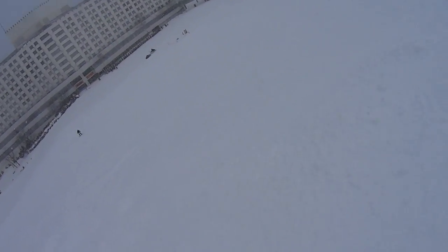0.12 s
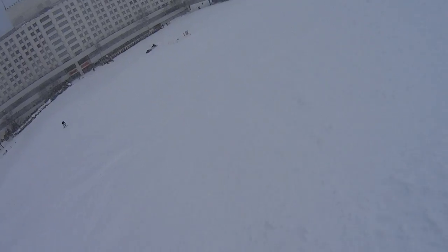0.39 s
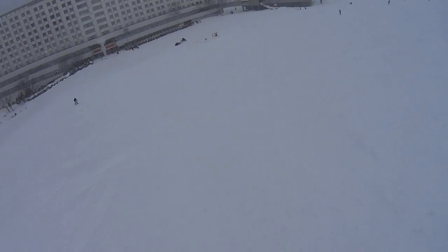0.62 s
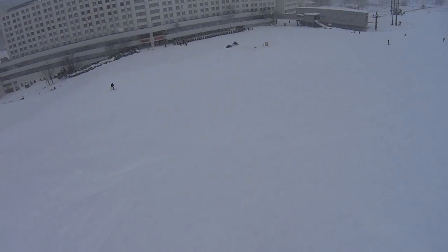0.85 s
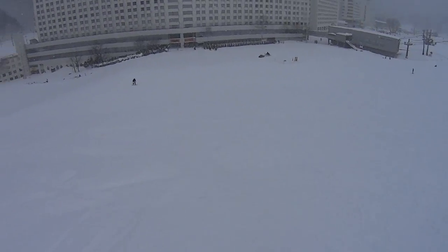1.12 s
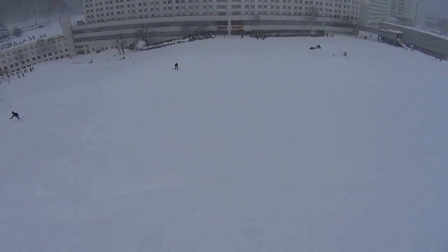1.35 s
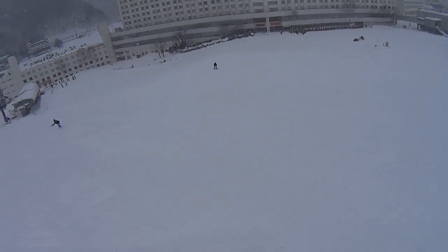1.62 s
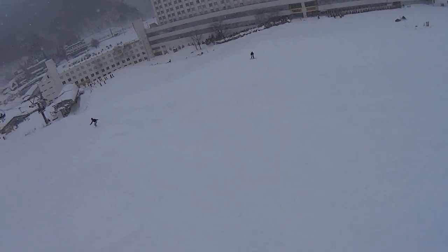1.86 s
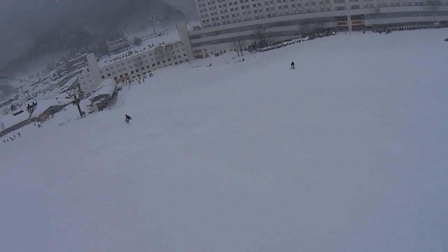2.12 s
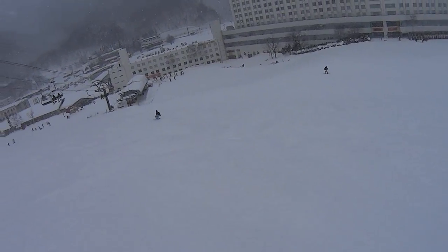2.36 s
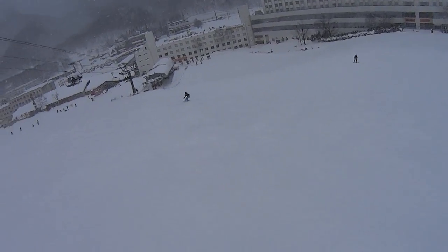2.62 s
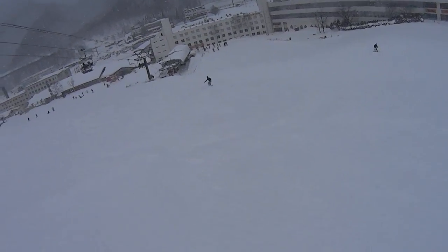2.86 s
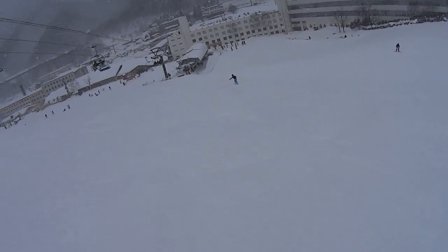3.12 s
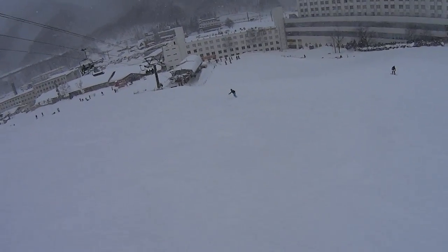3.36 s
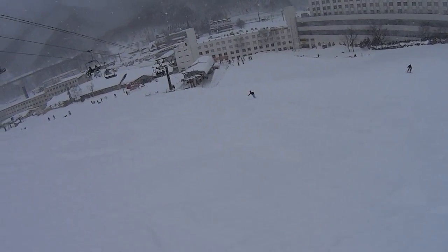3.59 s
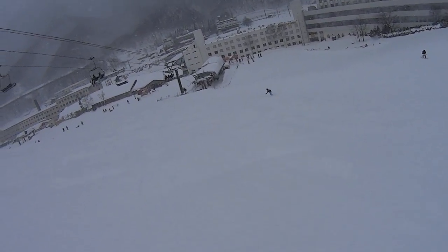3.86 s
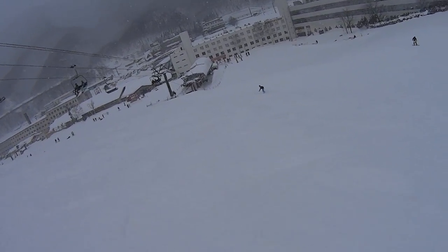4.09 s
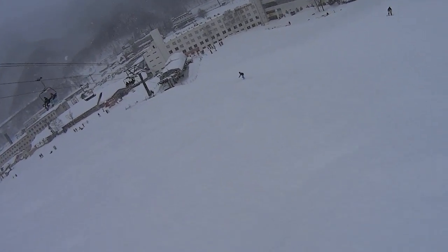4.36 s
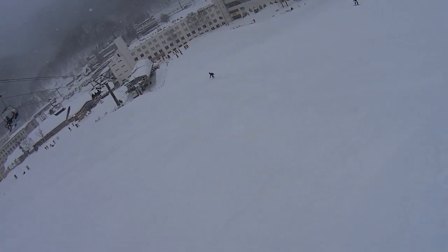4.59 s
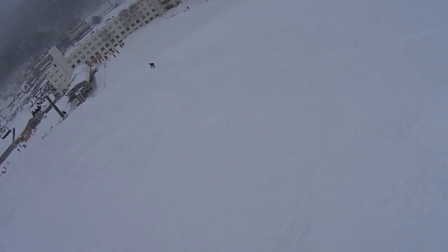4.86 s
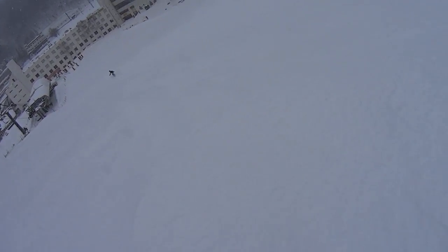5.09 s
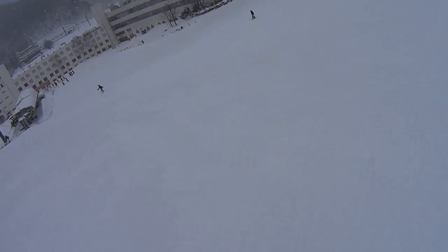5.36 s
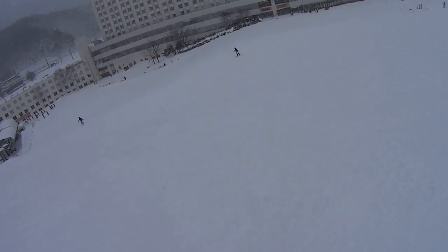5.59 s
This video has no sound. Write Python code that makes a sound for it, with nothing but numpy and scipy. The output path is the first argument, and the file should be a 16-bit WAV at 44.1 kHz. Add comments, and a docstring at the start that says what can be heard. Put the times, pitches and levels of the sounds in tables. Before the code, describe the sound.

Grainy snow hiss with rough edge scraping, irregular plastic clicks and dull helmet thuds, ending in a harder, louder scrape.

```python
"""Skis hiss over snow and their edges scrape, heard from a camera on the helmet of a skier going down a slope.
Hiss and scrape are grainy noise in flickering bands; hard scraping also makes the camera case ring.
The loose mount knocks and ticks on its plastic case: rough contacts ring groups of decaying modes.
Bumps thud through the helmet's modes; helmet drone, wind rumble and a low thrum are shaped noise beneath."""
import sys
import numpy as np
from scipy import signal
from scipy.fft import rfft, irfft
from scipy.io import wavfile
from scipy.ndimage import uniform_filter1d

SR = 44100
rng = np.random.default_rng(int(sys.argv[2]) if len(sys.argv) > 2 else 0)


def makeup_ratio(level_db):
    """Linear amplitude ratio for a level in decibels (20 dB per factor of ten)."""
    decades = np.asarray(level_db, float) / 20
    return 10 ** decades


def log_audio(samples):
    """Write samples as a 16-bit WAV file to the path given in sys.argv[1]."""
    # one column per channel
    frames = np.atleast_2d(samples).T
    # limit to full scale, then quantise
    limited = np.clip(frames, -1, 1)
    pcm = np.round(limited * 32767).astype(np.int16)
    wavfile.write(sys.argv[1], SR, pcm)


N = 252252
TIME_S = np.arange(N) / SR
HZ = np.maximum(np.fft.rfftfreq(N, 1 / SR), 1)
SIDES = np.array([[.5], [-.5]])  # splits a left minus right difference over the two ports

# The run. Each row: time in seconds, glide hiss in dB, edge scrape drive in dB, helmet drone in dB,
# calm wind in dB.
RUN = [(0.0, -45, -41.5, -49, -50), (0.12, -46.5, -49, -55.5, -66), (0.45, -49, -49, -57, -52),
       (0.7, -52, -53, -61, -62), (1.0, -52.5, -49, -53.5, -58), (1.28, -50, -49.5, -55, -50),
       (1.42, -45.5, -45, -60, -49), (1.77, -48, -47.5, -55.5, -56), (2.0, -49.5, -44.5, -52.5, -47),
       (2.17, -46.5, -42.5, -40.5, -56), (2.45, -47.5, -45.5, -52.5, -58), (2.9, -45, -47.5, -50, -53),
       (3.25, -47.5, -49, -54, -62), (3.7, -48, -50.5, -54, -67), (4.0, -47.5, -50, -52, -58),
       (4.19, -45, -48.5, -55, -58), (4.5, -47.5, -50.5, -54, -57), (4.75, -51, -47.5, -50, -48.5),
       (5.1, -49, -46.5, -49.5, -64), (5.2, -50.5, -43.5, -53, -55), (5.48, -49, -44, -53.5, -54),
       (5.72, -50, -37.5, -45.5, -45)]
# Modes of the plastic case, five groups from deep to bright. Each row: frequency in Hz, relative level in dB,
# t60 in seconds.
CASE = [
    [(776, -2.5, 0.017), (881, -2, 0.04), (1073, -7, 0.045)],
    [(1250, -11, 0.039), (1459, 8.5, 0.016), (1616, -3, 0.023)],
    [(2300, 8, 0.017), (2507, 11.5, 0.0097), (2720, -6, 0.024)],
    [(3330, -1.5, 0.004), (4000, 5, 0.0048), (4600, 6, 0.0052), (5450, 11, 0.003)],
    [(7140, 4, 0.007), (8160, 17.5, 0.0016), (9620, 5, 0.0044), (10500, 5, 0.0064)],
]


def over_hz(table):
    """Interpolates a (Hz, value) table over log frequency at every FFT bin."""
    hz, value = np.transpose(table)
    return np.interp(np.log(HZ), np.log(np.maximum(hz, 1)), value)


def unit(x):
    """Scales to rms 1."""
    return x / np.sqrt(np.mean(x ** 2))


def walk(rate_hz):
    """Random levels held 1 / rate_hz seconds and smoothed twice; rms 1."""
    hold = int(SR / rate_hz)
    held = np.repeat(rng.standard_normal(N // hold + 1), hold)
    slewed = uniform_filter1d(uniform_filter1d(held, hold), hold)
    return unit(slewed[:N])


def texture(spectrum, flicker_db, flicker_hz, grit_db, count):
    """Noise of uneven grains in count bands that flicker independently; the ports hear it partly alike."""
    # Each row: frequency in Hz, power share unrelated between the ports.
    port_apart = [(30, 0.0049), (150, 0.055), (400, 0.36), (1200, 0.39), (3000, 0.48), (9000, 0.18)]
    grit = rng.exponential(size=N // 40 + 1).repeat(40)[:N]  # one level per 40 samples
    grains = rng.standard_normal((3, N)) * makeup_ratio(grit_db * grit)
    common, left, right = rfft(grains / grains.std())
    apart = np.clip(over_hz(port_apart), 0, 1)
    both = np.sqrt(1 - apart) * common + np.sqrt(apart) * np.array([left, right])
    both = both * makeup_ratio(over_hz(spectrum))
    centres_hz = np.geomspace(spectrum[0][0], spectrum[-1][0], count)
    out = 0
    for hat in np.eye(count):
        share = np.interp(np.log(HZ), np.log(centres_hz), hat)
        out = out + irfft(both * share, N) * makeup_ratio(flicker_db * walk(flicker_hz))
    return unit(out)


def ring(x, modes):
    """Sum of decaying two-pole resonances struck by x."""
    out = 0
    for hz, db, t60_s in modes:
        pole = np.exp(2j * np.pi * hz / SR - np.log(1000) / (t60_s * SR))
        mode = signal.lfilter([0, pole.imag], [1, -2 * pole.real, abs(pole) ** 2], x)
        out = out + makeup_ratio(db) * mode / np.sqrt(len(modes))
    return out


def glide_hiss(glide):
    """Ski bases sliding over snow: broad noise that follows the glide level."""
    # Each row: frequency in Hz, relative density in dB per Hz.
    hiss_spectrum = [(1470, -23), (2500, -2.5), (4090, -3), (5770, -3), (6770, -8.5), (10600, -20.5),
                     (11300, -31), (11500, -41), (15000, -71), (22000, -120)]
    return glide * texture(hiss_spectrum, flicker_db=1.7, flicker_hz=21.96, grit_db=1.6, count=5)


def edge_scrape(scrape):
    """Ski edges scraping: peaky noise whose level rises less steeply than the drive."""
    # Each row: frequency in Hz, relative density in dB per Hz.
    scrape_spectrum = [(200, -31), (300, -16), (420, 2), (600, -6), (800, 1.5), (900, -5.5), (1020, -3),
                       (1150, 0), (1430, -2), (1650, -12), (1800, -4), (2050, -4.5), (2280, -2),
                       (2600, -14.5), (3000, -12), (3400, -8.5), (4300, -30.5)]
    noise = texture(scrape_spectrum, flicker_db=2.43, flicker_hz=25.096, grit_db=0.72, count=7)
    return scrape ** 0.82 * makeup_ratio(-6.5) * noise


def shudder(scrape):
    """Harder scraping shakes the case: dense uneven grains ring its dull and hollow modes."""
    grains_per_s = 1200
    grains = rng.standard_normal((3, N)) * (rng.random(N) < grains_per_s / SR) * makeup_ratio(0.93 * walk(40))
    shake = grains[0] + .5 * grains[1:]  # partly common to the ports
    dull = unit(ring(shake, CASE[1]))
    hollow = unit(ring(shake, CASE[2]))
    return (dull + 0.26 * hollow) * scrape ** 1.515 * makeup_ratio(21)


def blows(times, pan_db, contact_s, unlike):
    """One short rough contact per event, peaking near contact_s, a little unlike at the two ports."""
    t = np.arange(int(.04 * SR)) / SR
    noise = rng.standard_normal((len(times), 3, len(t)))
    rough = noise[:, :1] + unlike * noise[:, 1:]
    return makeup_ratio(pan_db[:, None, None] * SIDES) * rough * t * np.exp(-t / contact_s)


def strike(times, level_db, pan_db, modes, contact_s, unlike, faint_db, count):
    """Blows ring one group of modes, band-limited around it, with count faint ones scattered between."""
    when, weakness, side = rng.random((count, 3)).T
    faint_s = when * N / SR
    s, scrape_db = np.transpose(RUN)[[0, 2]]
    rough_db = np.interp(faint_s, s, scrape_db - scrape_db.mean())  # faint blows follow the edge scrape
    times = np.append(times, faint_s)
    level_db = np.append(level_db, faint_db - 12 * weakness + rough_db)
    pan_db = np.append(pan_db, 6 * (side - .5))
    band_hz = [0.75 * modes[0][0], 1.253 * modes[-1][0]]
    band = signal.butter(3, band_hz, "band", fs=SR, output="sos")
    sounds = signal.sosfilt(band, ring(blows(times, pan_db, contact_s, unlike), modes))
    out = np.zeros((2, N + sounds.shape[2]))
    for s, db, sound in zip(times, level_db, sounds):
        i = max(int((s - contact_s) * SR), 0)
        peak = np.abs(sound).max(axis=1).mean()
        out[:, i:i + sound.shape[1]] += makeup_ratio(db) * sound / peak
    return out[:, :N]


def mount_knocks():
    """The loose mount knocks on the case and rings its three lower mode groups."""
    # Each row: time in seconds, dull level in dB, hollow level in dB.
    knock_rows = [(0.0099, -19, -27), (0.2434, -26.5, -31), (0.292, -26, -29), (0.295, -24, -22.5),
                  (0.3019, -24, -18), (0.3116, -30, -26), (0.3168, -31, -23), (0.33, -33, -36),
                  (0.3925, -34, -35), (0.4014, -27, -33), (0.4324, -23, -31), (0.4385, -24, -32),
                  (0.463, -24.5, -26.5), (0.5025, -31.5, -26.5), (0.956, -22.5, -22.5), (0.99, -31, -32),
                  (1.044, -27.5, -24), (1.216, -39, -20), (1.3062, -25, -29.5), (1.3913, -30, -22),
                  (1.4203, -31, -24.5), (1.447, -27, -35), (1.463, -22, -21), (1.505, -13.5, -21),
                  (1.508, -15, -18), (1.5184, -18.5, -18), (1.6036, -45, -28.5), (1.6565, -24.5, -28),
                  (1.6959, -20, -13), (1.8267, -23.5, -17.5), (1.865, -32, -29), (1.9331, -21.5, -24),
                  (2.0897, -20, -19), (2.0949, -22, -28), (2.0998, -27, -44), (2.125, -38, -22),
                  (2.128, -25, -25), (2.162, -23.5, -19), (2.166, -16.5, -22), (2.1724, -20, -15.5),
                  (2.1783, -24, -28), (2.2007, -45, -30), (2.2299, -24, -27), (2.2797, -26.5, -51),
                  (2.345, -27, -31), (2.365, -24, -22.5), (2.516, -24.5, -18), (2.5931, -22.5, -29),
                  (2.6776, -22.5, -17.5), (2.6904, -41, -26), (2.8288, -38, -33), (2.8471, -18.5, -22),
                  (2.945, -29, -25.5), (2.969, -35, -30), (3.0707, -26, -33), (3.1003, -17.5, -21),
                  (3.1093, -21.5, -38), (3.113, -11.5, -11.5), (3.1625, -32, -35), (3.1842, -49, -27),
                  (3.192, -28.5, -42), (3.2113, -35, -40), (3.2642, -50, -35), (3.4066, -22, -27),
                  (3.4557, -24, -19.5), (3.676, -46, -32), (3.7976, -31.5, -31), (3.859, -25, -21),
                  (3.9112, -31, -24), (4.3037, -25.5, -20), (4.4252, -27.5, -24.5), (4.548, -29, -29),
                  (4.588, -38, -24), (4.6683, -29, -34), (4.7776, -50, -30), (4.793, -28, -24),
                  (4.911, -36, -27), (4.9585, -46, -28.5), (5.0404, -26, -21.5), (5.0785, -22, -15),
                  (5.1574, -47, -18), (5.1759, -31, -26), (5.2225, -30, -26), (5.2904, -28.5, -29),
                  (5.3202, -34, -22), (5.639, -27, -30)]
    s, dull_db, hollow_db = np.transpose(knock_rows)
    deep_db = 1.44 * dull_db + 1.5  # only hard knocks reach the deepest modes
    deep = strike(s, deep_db, 0 * s, CASE[0], contact_s=0.0005, unlike=0.28, faint_db=-34.5, count=60)
    dull = strike(s, dull_db, 0 * s, CASE[1], contact_s=0.00046, unlike=0.48, faint_db=-34.5, count=120)
    hollow = strike(s, hollow_db, 0 * s, CASE[2], contact_s=0.00032, unlike=0.25, faint_db=-31.5, count=120)
    return deep + dull + hollow


def case_ticks():
    """Hard snow and small parts tick on the case: shorter contacts ring its two upper mode groups."""
    # Each row: time in seconds, lower tick in dB, upper tick in dB, left minus right in dB.
    tick_rows = [(0.402, -24.5, -28, 8), (0.991, -29, -40, 0), (1.2165, -27.5, -29.5, -2),
                 (1.3235, -22.5, -31, -5), (1.3918, -25, -41, -3), (1.4637, -15, -21.5, -1),
                 (1.5144, -20, -39, -4), (1.5181, -12, -13.5, -5), (1.6574, -23, -33, -3),
                 (1.6606, -23, -42, -5), (1.6965, -24, -31, 10), (1.8273, -27, -35, -4),
                 (1.8662, -26, -34, -2), (1.9336, -16, -45, -5), (1.9835, -34, -32, -3),
                 (2.091, -15.5, -21, -6), (2.0944, -23, -32, -4), (2.1241, -20, -27.5, -5),
                 (2.1604, -16, -23, -1), (2.1725, -9.5, -20.5, -2), (2.3448, -28.5, -45, -1),
                 (2.5168, -28, -37, -4), (2.679, -28, -41, -3), (2.753, -27, -49, -6),
                 (2.8297, -16, -18.5, -4), (2.8477, -30, -45, -2), (3.0918, -22.5, -28.5, -4),
                 (3.1026, -27, -43, 3), (3.1136, -16, -50, -5), (3.1842, -20, -33, 3),
                 (3.2639, -22.5, -40, -2), (3.6762, -14, -17, 6), (3.9109, -28, -45, 0),
                 (4.111, -26, -40, -8), (4.5484, -24, -34, -2), (4.7778, -27, -37, 1),
                 (4.7936, -29, -39, -1), (4.9097, -25, -34.5, -4), (5.0118, -27, -45, 2),
                 (5.0253, -37, -31, 3), (5.0788, -26, -29, -7), (5.1582, -32, -25, -4),
                 (5.179, -28, -31, 0), (5.2229, -31.5, -33, -5), (5.2326, -35.5, -33, -11),
                 (5.26, -31, -28, 9), (5.2829, -30, -30, -11), (5.2904, -24.5, -32, 10),
                 (5.3209, -28.5, -29, -1), (5.6326, -28, -34, 2)]
    s, lower_db, upper_db, pan_db = np.transpose(tick_rows)
    lower = strike(s, lower_db, pan_db, CASE[3], contact_s=.0002, unlike=0.69, faint_db=-34.5, count=150)
    upper = strike(s, upper_db, pan_db, CASE[4], contact_s=0.00016, unlike=0.45, faint_db=-39, count=150)
    return lower + upper


def bumps():
    """Soft pushes make the helmet thud, each with its own share of upper modes."""
    # Each row: time in seconds, low push in dB, upper push in dB.
    bump_rows = [(0.025, -40, -37), (0.195, -36, -34), (0.246, -38, -37), (1.297, -45, -37),
                 (1.513, -31, -26.5), (1.832, -32, -39), (2.088, -25, -24.5), (2.158, -34.5, -34),
                 (2.23, -27, -33), (2.402, -29.5, -36), (2.595, -35, -33), (2.779, -33, -47),
                 (2.848, -26, -27), (3.069, -33, -34), (3.164, -27.5, -54), (3.405, -30, -31.5),
                 (3.497, -33, -40), (3.8, -35, -46), (3.838, -36, -34), (4.345, -33, -43),
                 (5.219, -31, -47), (5.662, -41.5, -37)]
    # Low and upper group. Each row: frequency in Hz, relative level in dB, t60 in seconds.
    helmet_modes = [
        [(115, -22, 0.079), (195.8, -0.5, .13)],
        [(303, -1, 0.033), (402, 2.5, 0.028)],
    ]
    s, *level_db = np.transpose(bump_rows)
    out = 0
    for db, modes, push_s in zip(level_db, helmet_modes, (.002, .001)):
        push = np.zeros(N)
        push[(s * SR).astype(int)] = makeup_ratio(db)
        soft = np.hanning(int(push_s * SR))
        out = out + ring(np.convolve(push, soft / soft.sum())[:N], modes)
    return out


def buffets():
    """Buffets shake the helmet: fast swells and slower fades, as added gains for wind rumble and drone."""
    # Each row: time in seconds, rumble in dB, drone in dB, fade time constant in seconds.
    buffet_rows = [(0.048, -28.5, -51, 0.045), (0.27, -49, -56, .06), (0.46, -57, -47, 0.021),
                   (0.51, -49, -61, 0.028), (0.64, -55, -60, 0.055), (0.94, -42, -58, 0.065),
                   (1.318, -50, -40, 0.032), (1.46, -40.5, -45.5, 0.14), (1.86, -49, -57, 0.055),
                   (2.17, -23.5, -42.5, 0.038), (2.39, -48, -53, 0.029), (2.58, -38, -43.5, 0.078),
                   (2.74, -42, -57, 0.033), (2.9, -37, -40.5, 0.018), (2.99, -41, -51, 0.12),
                   (3.3, -36.5, -49, 0.043), (3.41, -43, -44.5, 0.031), (3.55, -47, -65, 0.015),
                   (3.65, -50, -55, 0.019), (3.74, -39.5, -56.5, .12), (4.19, -52, -50, 0.095),
                   (4.83, -52, -53, 0.11), (5.03, -42, -54, .06), (5.18, -38, -63, 0.038),
                   (5.27, -52, -47, 0.06), (5.54, -38, -52, 0.095)]
    rise_share = 0.4  # rise time constant / fade time constant
    s, rumble_db, drone_db, fade_s = np.transpose(buffet_rows)
    after = (TIME_S - s[:, None]) / fade_s[:, None]
    swell = np.exp(-np.maximum(after, -after / rise_share))
    return makeup_ratio(rumble_db) @ swell, makeup_ratio(drone_db) @ swell


def helmet_drone(level):
    """The helmet's drone: low noise in strongly flickering bands."""
    # Each row: frequency in Hz, relative density in dB per Hz.
    drone_spectrum = [(41, -16), (70, -8.5), (108, -14), (183, -0.5), (264, -12.5), (350, -14), (460, -46),
                      (770, -120)]
    return level * texture(drone_spectrum, flicker_db=3.6, flicker_hz=17, grit_db=0.11, count=3)


def wind_rumble(level):
    """Wind: deep noise in two slowly flickering bands."""
    # Each row: frequency in Hz, relative density in dB per Hz.
    wind_spectrum = [(8.8, -26), (15, 5.5), (38, 7.5), (52, 0.5), (75, -18), (100, -12), (130, -49),
                     (220, -120)]
    return level * texture(wind_spectrum, flicker_db=1.2, flicker_hz=5.3, grit_db=.1, count=2)


def low_thrum():
    """Low thrum between rumble and drone: narrow noise on its own level curve."""
    # Each row: time in seconds, level in dB.
    thrum_level = [(0.0, -53), (0.16, -55), (0.62, -67.5), (2.26, -55.5), (2.63, -63), (3.1, -61),
                   (4.11, -66), (5.15, -51), (5.72, -55)]
    # Each row: frequency in Hz, relative density in dB per Hz.
    thrum_spectrum = [(40, -30), (62, 0.5), (100, 1.5), (135, -8.5), (200, -41)]
    level = makeup_ratio(np.interp(TIME_S, *np.transpose(thrum_level)))
    return level * texture(thrum_spectrum, flicker_db=2.5, flicker_hz=11, grit_db=.1, count=2)


def scene():
    """Skis, case, helmet and wind summed at the two ports."""
    s, *columns = np.transpose(RUN)
    glide, scrape, drone, wind = (makeup_ratio(np.interp(TIME_S, s, db)) for db in columns)
    rumble, shake = buffets()
    skis = glide_hiss(glide) + edge_scrape(scrape)
    case = shudder(scrape) + mount_knocks() + case_ticks()
    low = helmet_drone(drone + shake) + wind_rumble(wind + rumble) + low_thrum()
    return skis + case + bumps() + low


def top_cut(x):
    """Nothing passes above the cut-off."""
    return signal.sosfilt(signal.butter(12, 12260, fs=SR, output="sos"), x)


def record(dry):
    """Two ports in the case hear with their own level and phase; a steep low-pass cuts the top."""
    # Each row: frequency in Hz, phase lead of the left port in radians.
    port_lead = [(0, -1), (340, 0.86), (600, 2.5), (1210, 1.35), (1980, 1.32), (2330, 0.96), (2760, 1.03),
                 (3360, 0.84), (4310, -0.2), (6030, -0.1), (7150, 0.4), (8610, 0.45), (11000, 1.23),
                 (11800, -12)]
    # Each row: frequency in Hz, left minus right in dB.
    port_balance = [(60, 1), (110, 2.5), (190, 1), (350, 3), (620, -1), (1120, 0), (2010, 1.5), (3620, 2.5),
                    (6490, 1.0), (11700, 0.5)]
    ports = makeup_ratio(over_hz(port_balance) * SIDES) * np.exp(1j * over_hz(port_lead) * SIDES)
    heard = irfft(rfft(dry) * ports, N)
    top_hz = 10980
    low_pass = signal.ellip(7, .3, 40, top_hz, fs=SR, output="sos")  # 0.3 dB ripple, 40 dB stopband
    mix = signal.sosfilt(low_pass, heard)
    return top_cut(mix)


dry = scene()
out = record(dry)
log_audio(out)
```